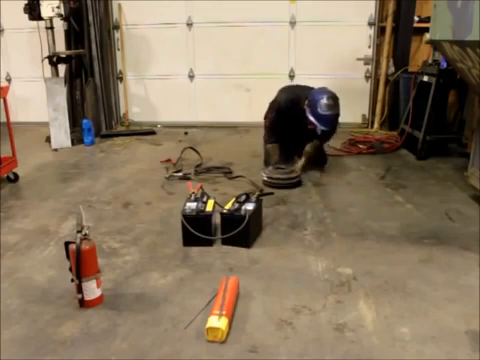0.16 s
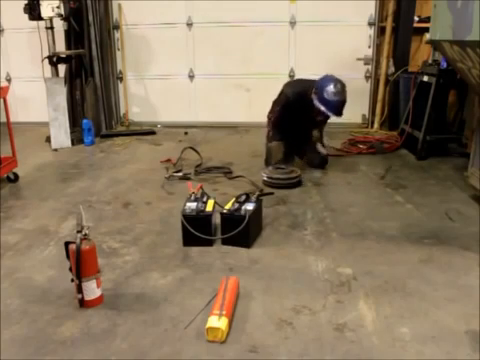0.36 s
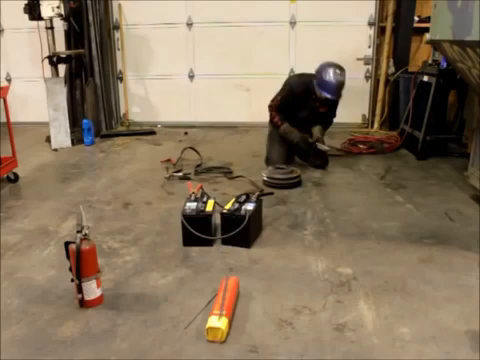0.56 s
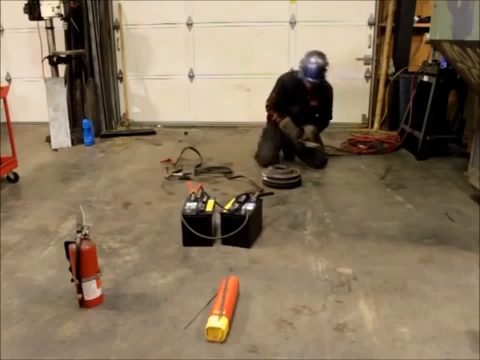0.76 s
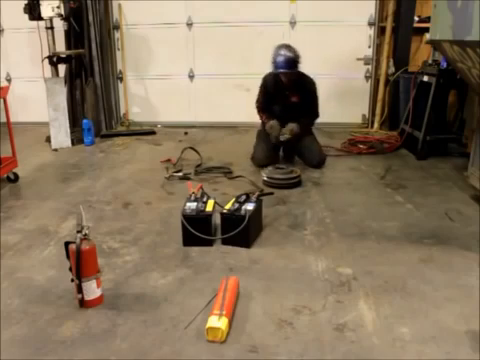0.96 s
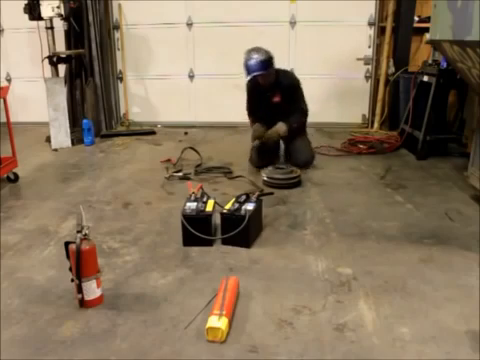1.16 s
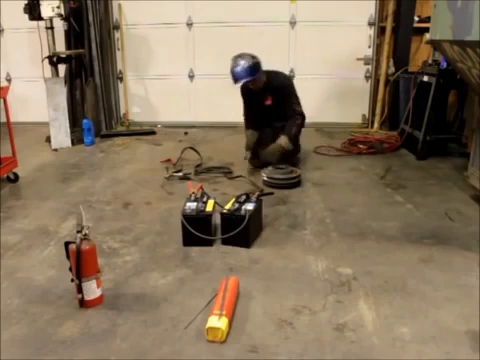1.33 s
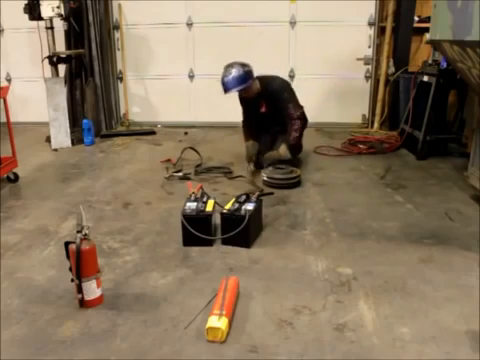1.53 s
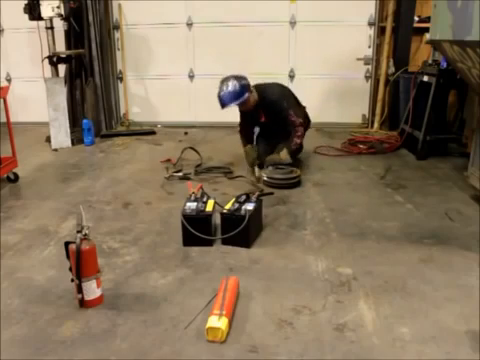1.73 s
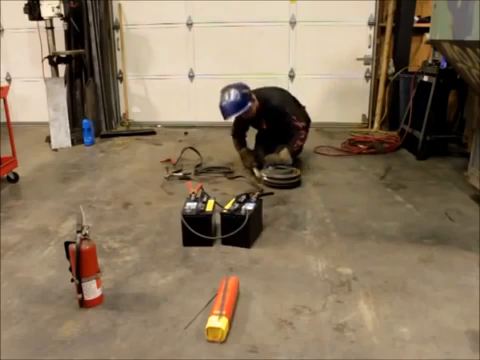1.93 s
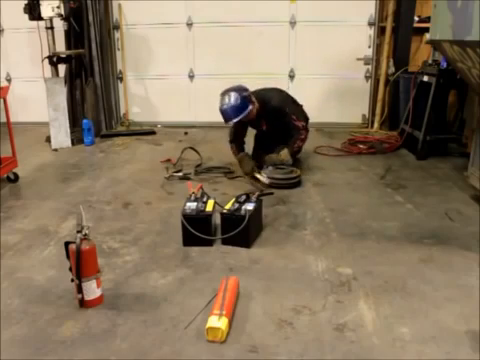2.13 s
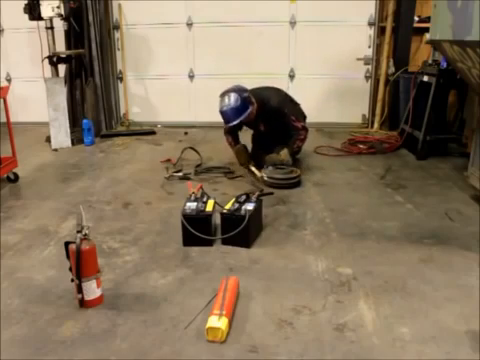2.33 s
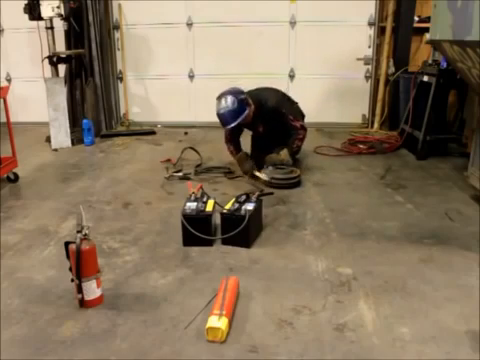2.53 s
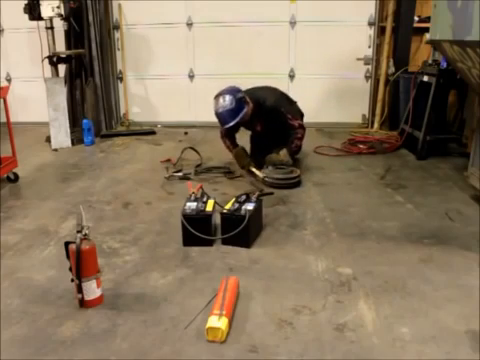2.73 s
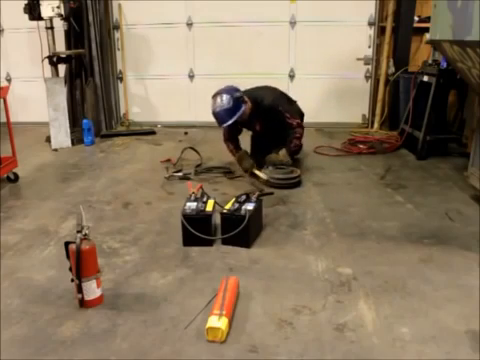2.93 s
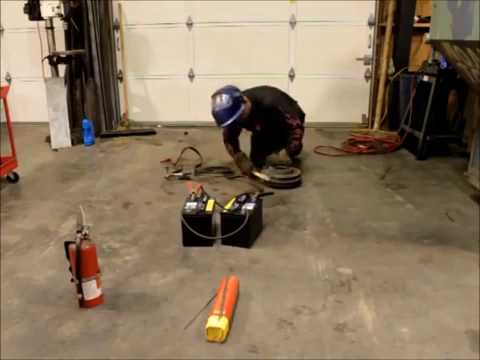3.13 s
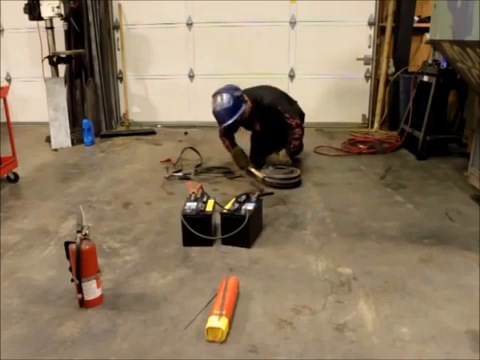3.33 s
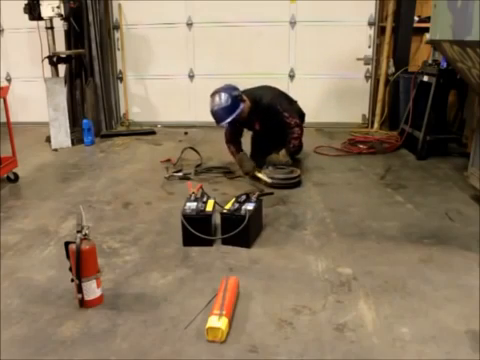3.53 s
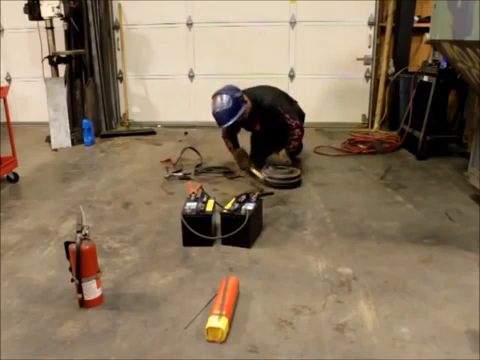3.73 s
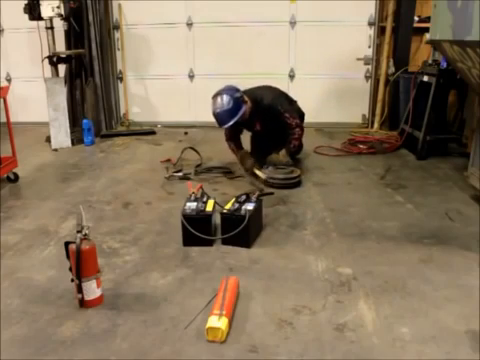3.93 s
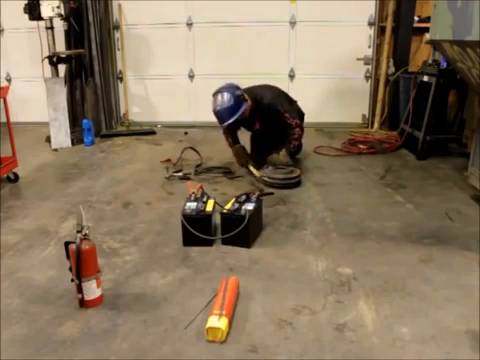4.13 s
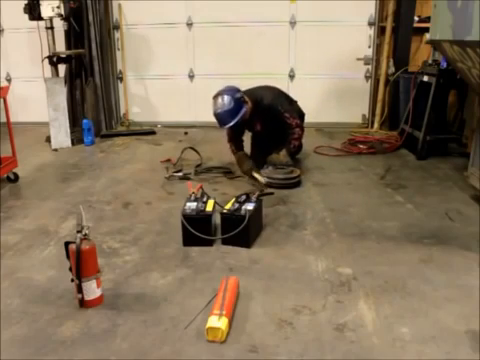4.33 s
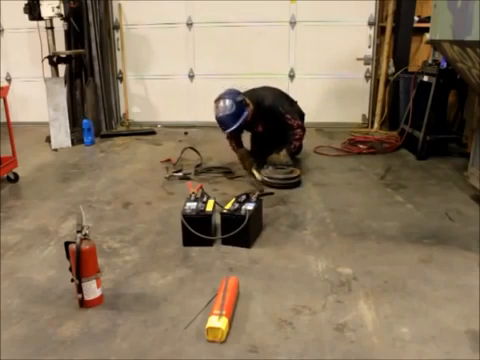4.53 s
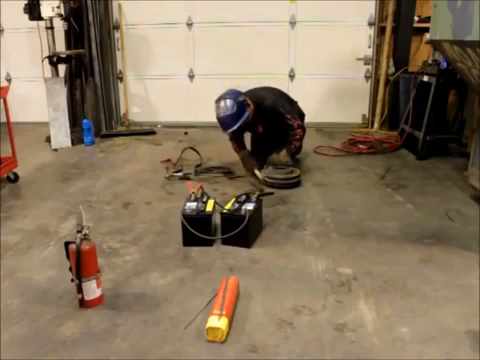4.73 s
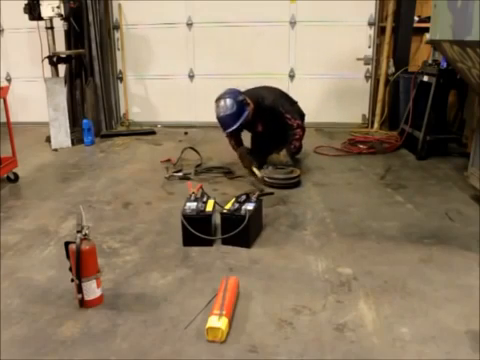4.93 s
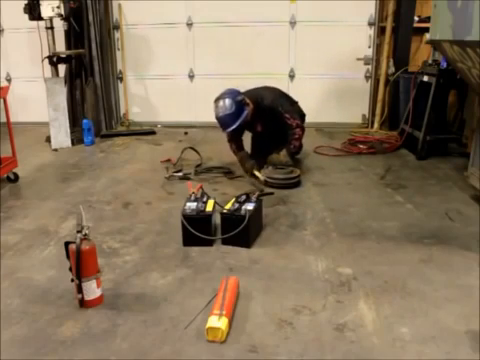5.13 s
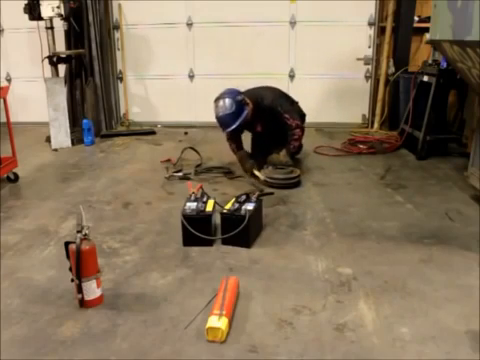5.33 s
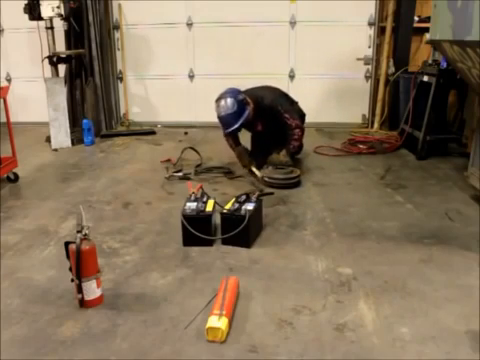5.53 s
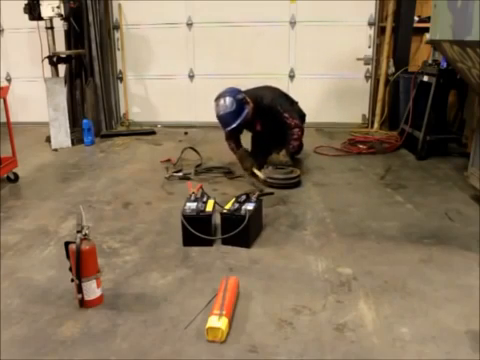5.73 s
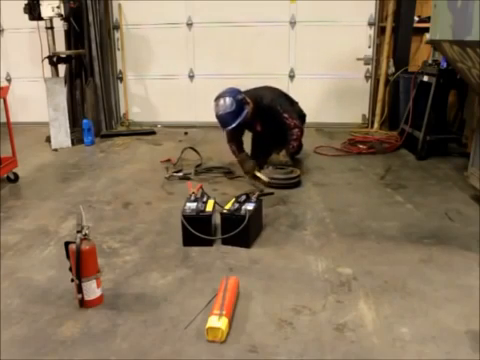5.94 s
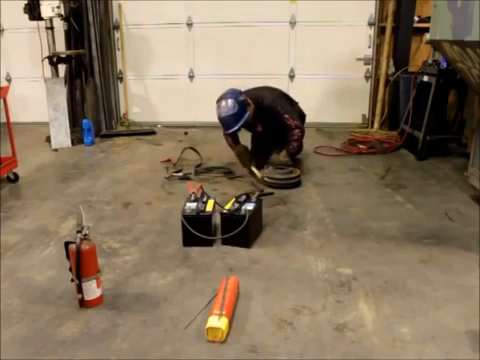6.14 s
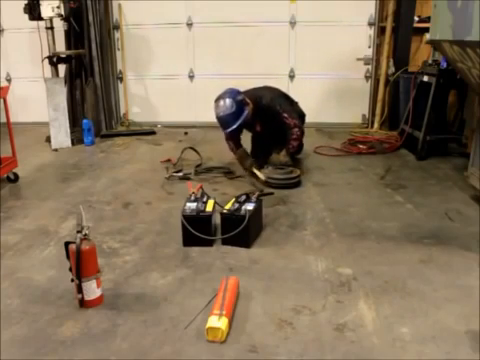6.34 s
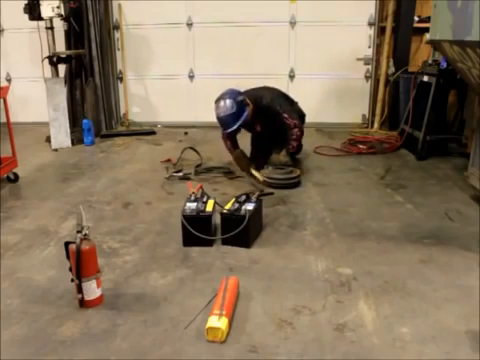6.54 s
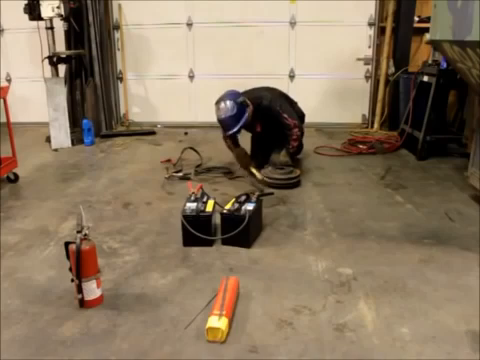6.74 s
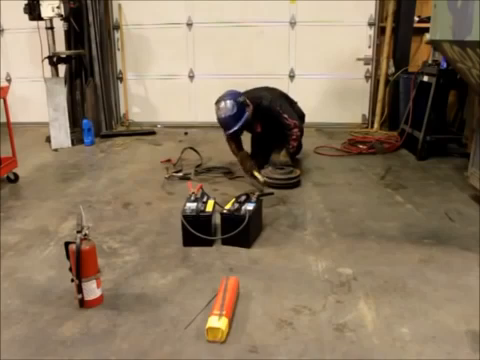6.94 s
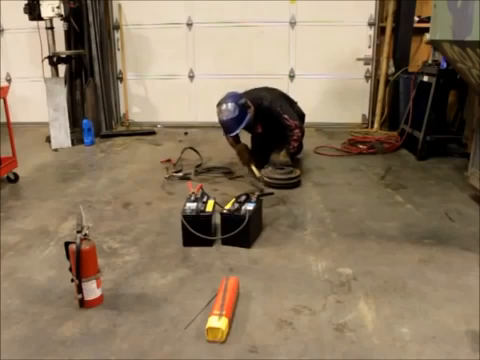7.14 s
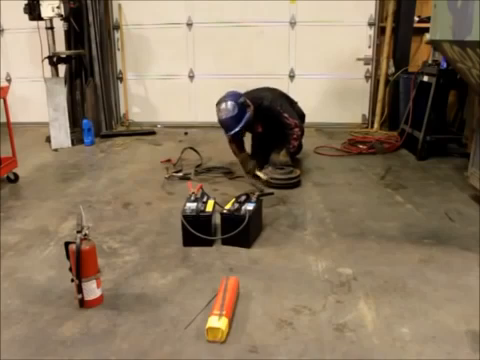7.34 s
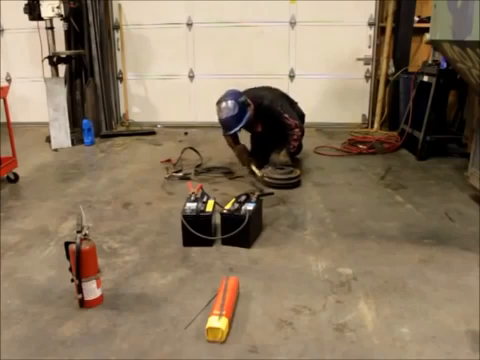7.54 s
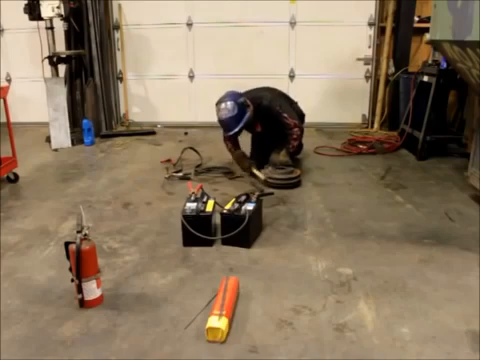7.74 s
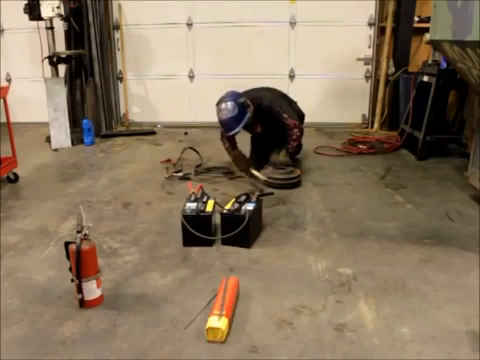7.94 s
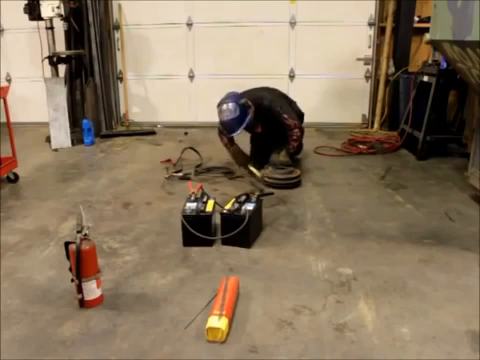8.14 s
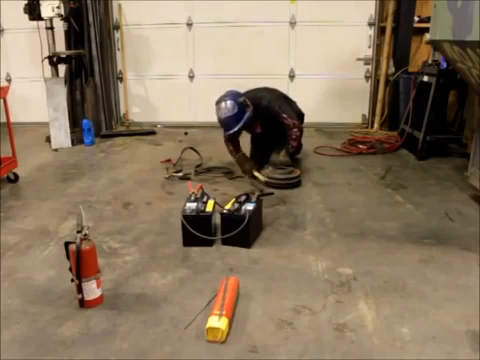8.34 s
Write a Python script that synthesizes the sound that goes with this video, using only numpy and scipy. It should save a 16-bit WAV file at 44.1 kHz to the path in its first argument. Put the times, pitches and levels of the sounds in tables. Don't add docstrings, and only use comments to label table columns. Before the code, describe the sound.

A last hard stroke of a wire brush on steel rasps at once and its echo fades, leaving lamp hum, hiss and a far motor winding down, with faint ticks. After about two seconds the scrubbing returns in quick alternating strokes, pauses briefly with a sharp metallic tick, then runs again to the end, loosening slightly and knocking the part on concrete. One microphone a few metres away in a reverberant garage.

```python
import sys
import numpy as np
from scipy import signal
from scipy.fft import rfft, irfft, next_fast_len
from scipy.io import wavfile
from scipy.ndimage import uniform_filter1d

SR = 44100
rng = np.random.default_rng(int(sys.argv[2]) if len(sys.argv) > 2 else 0)


def digitize_waveform(pressure):
    field = np.atleast_2d(pressure).T
    bounded = np.clip(field, -1, 1)
    quanta = np.round(bounded * 32767).astype(np.int16)
    wavfile.write(sys.argv[1], SR, quanta)


def gain_from_db(level_db):
    decades = np.asarray(level_db, float) / 20
    return 10 ** decades


N = 369558
LEAD = SR // 2
M = N + LEAD
T = (np.arange(M) - LEAD) / SR
MAINS_HZ = 59.993


def unit(x):
    return x / np.sqrt(np.mean(x ** 2))


def on_log(hz, table):
    points = np.array(table)
    return np.interp(np.log(hz + 1), np.log(points[:, 0]), points[:, 1])


def colour(x, table):
    size = next_fast_len(len(x))
    gain = gain_from_db(on_log(np.fft.rfftfreq(size, 1 / SR), table))
    return irfft(rfft(x, size) * gain, size)[:len(x)]


def ring(x, hz, width):
    return signal.lfilter(*signal.iirpeak(hz, hz / width, SR), x)


def walk(rate):
    hold = int(SR / rate)
    levels = np.repeat(rng.standard_normal(M // hold + 1), hold)
    return 0.88 * uniform_filter1d(levels, hold)[:M]


def air():
    # frequency in Hz, level in dB.
    air_spectrum = [(20, -24), (45, -29), (62, -10), (78, -6), (98, -11), (125, -6.5), (185, 1),
                    (300, -2.5), (500, -2), (1330, -6), (2300, -10.5), (2830, -9), (4020, -12),
                    (6030, -13.5), (15500, -24)]
    # time in seconds, level in dB.
    motor_levels = [(0, -43), (1.5, -43), (2.3, -50), (2.7, -75), (3.2, -70), (4.1, -58), (8.38, -68)]
    hush = unit(colour(rng.standard_normal(M), air_spectrum)) * gain_from_db(-46 + 0.17 * walk(1.3))
    rumble = unit(ring(ring(rng.standard_normal(M), 133, 60), 133, 60))
    return hush + rumble * gain_from_db(np.interp(T, *np.transpose(motor_levels)) - 15)


def buzz():
    k = np.arange(28, 150)
    size, cycle = 4096, np.zeros(2049, complex)
    fade_db = -1.3 * k * MAINS_HZ / 1000
    db = -68 + fade_db + 4 * rng.standard_normal(len(k))
    cycle[k] = gain_from_db(db) * np.exp(2j * np.pi * rng.random(len(k))) * size / 2
    place = T * MAINS_HZ % 1 * size
    return np.interp(place, np.arange(size), irfft(cycle), period=size) * gain_from_db(1.2 * walk(2.8))


def lamps():
    # multiple of mains, level in dB.
    core_hum = [(1, -61), (2, -63), (4, -59.5), (6, -62), (8, -56), (10, -59.5), (12, -61), (14, -62.5),
                (16, -64.5), (18, -69), (20, -58), (22, -56), (24, -61), (26, -57)]
    # multiple of mains, level in dB.
    plate_whine = [(30, -66), (32, -59), (36, -53.5), (38, -64), (44, -60), (46, -59), (48, -56.5),
                   (56, -62), (60, -60), (62, -65), (52, -68), (67.6, -79), (74, -68)]
    # multiple of mains (rounded below), level in dB.
    tube_buzz = [(78, -68), (79.5, -67), (90, -65), (92, -63), (99.3, -60), (98.4, -59), (99.8, -65),
                 (105, -74), (108, -65), (112, -61.5), (71.5, -65), (116, -68), (138, -67), (141, -73)]
    out = np.zeros(M)
    for group in (core_hum, plate_whine, tube_buzz):
        for k, db in group:
            phase = 2 * np.pi * (np.round(k) * MAINS_HZ * T + rng.random())
            out += gain_from_db(db + 2 + 1.5 * walk(4)) * np.sin(phase)
    return out


def knocks():
    # start in seconds, mode in Hz, level in dB, width in Hz, decay of the push in ms.
    bursts = [(.1, 930, -32.5, 900, 92), (1.12, 4000, -46, 2000, 69), (4.14, 232, -38.5, 40, 78),
              (4.17, 153, -41.5, 30, 33), (4.402, 4560, -33, 201, 14), (4.402, 3300, -44, 400, 6),
              (4.839, 936, -36, 150, 25), (7.246, 496, -37, 50, 63), (7.297, 1177, -33, 110, 28),
              (7.299, 225, -37, 120, 50), (7.33, 160, -40, 30, 23), (7.55, 183, -41, 25, 50)]
    out, dt = np.zeros(M + SR), np.arange(SR // 2) / SR
    for s, hz, db, width, push_ms in bursts:
        clear = min(60 / width, .7)
        rattle = unit(ring(rng.standard_normal(len(dt)), hz, width))
        push = clear * np.sin(2 * np.pi * hz * dt) + (1 - clear) * rattle
        envelope = (1 - np.exp(-dt / 0.0019)) * np.exp(-1000 * dt / push_ms)
        start = int(s * SR) + LEAD
        out[start:start + len(dt)] += gain_from_db(db) * envelope * push
    return out[:M]


def contacts():
    # time of full speed in seconds, rasp in dB, length in ms.
    pushes = [(-0.01, -21, 79), (2.909, -21.5, 73), (3.202, -20.5, 68), (3.511, -21.5, 70),
              (5.131, -23, 62), (5.408, -21.5, 68), (5.694, -21, 76), (5.976, -20.5, 67),
              (6.274, -21.5, 85), (6.628, -23, 92), (6.986, -22, 96), (8.35, -23, 72)]
    # time of full speed in seconds, rasp in dB, length in ms.
    pulls = [(0.114, -16.5, 43.3), (2.733, -21.5, 92), (3.043, -21, 83), (3.339, -18, 69.5),
             (3.666, -21, 81), (4.97, -22.5, 82), (5.256, -22.5, 75), (5.521, -18.5, 67.4),
             (5.813, -20, 70), (6.094, -18, 70), (6.414, -19, 84), (6.783, -23.5, 102), (7.134, -25, 94),
             (7.849, -23.5, 82)]
    # time of full speed in seconds, rasp in dB, length in ms.
    shoves = [(2.127, -25.5, 132), (2.584, -23.5, 98), (4.844, -25.5, 81), (7.363, -21.5, 70),
              (7.709, -23, 84), (8.029, -22, 75)]
    # time of full speed in seconds, rasp in dB, length in ms.
    drags = [(2.279, -25.5, 117), (3.819, -26, 120), (3.987, -20.5, 117), (4.536, -24, 108),
             (7.476, -20, 82), (8.14, -21, 96)]
    # time of full
    # speed in seconds, rasp in dB, length in ms, steel ring minus rasp in dB.
    rubs = [(.19, -22, 50, -6.5), (.64, -49, 39, 2), (1.06, -53, 60, 5), (1.12, -42, 32, 9),
            (1.27, -54, 150, 5), (1.87, -45.5, 70, 1), (1.99, -43, 66, -13), (3.045, -28, 33, -14),
            (3.9, -35, 32, -1), (4.008, -21.5, 34, -11), (4.11, -33.5, 140, -6), (4.42, -30, 17, -2),
            (4.439, -32, 32, 0), (.01, -36, 80, 8.5), (1.797, -36.5, 8, -7), (6.65, -37, 110, 2.5),
            (7.26, -37.5, 90, -1)]
    # time of full speed in seconds, rasp in dB, length in ms,
    # steel ring minus rasp in dB.
    ticks = [
        (.543, -48, 12, -13),
        (1.716, -49, 33, -12),
        (1.812, -39, 24, -6),
        (1.982, -43, 8, -12),
        (4.403, -26.5, 5.3, -4),
    ]
    found = []
    for rows, rise, ring_db in ((pushes, .47, -9), (pulls, 0.41, -8), (shoves, 0.58, -8.5), (drags, .23, -9)):
        for s, db, ms in rows:
            steel_db = ring_db - 0.29 * (db + 22)
            found.append((s, db, ms * rise, ms * (1 - rise), steel_db, -2.5))
    for rows, rise in ((rubs, 0.5), (ticks, 0.18)):
        for s, db, ms, steel_db in rows:
            bright_db = -2 - .4 * steel_db
            found.append((s, db, ms * rise, ms * (1 - rise), steel_db, bright_db))
    return found


def slips(rate, spread_db):
    hit, sign, size = rng.random((3, M))
    strength = gain_from_db(-spread_db * np.log(size + 1 / 60))
    return unit((hit < rate / SR) * np.sign(sign - .5) * strength)


def swells(db):
    power = np.zeros(M)
    for (s, _, rise, fall, *_), d in zip(contacts(), db):
        near = slice(max(int((s - .3) * SR) + LEAD, 0), int((s + .3) * SR) + LEAD)
        dt = 1000 * (T[near] - s)
        power[near] += gain_from_db(d) ** 2 * np.exp(-(dt / np.where(dt < 0, rise, fall)) ** 2)
    return np.sqrt(power)


def brush():
    # frequency in Hz, level in dB per Hz.
    rasp_spectrum = [(1470, -25.5), (2500, -8), (3130, -9), (5120, -7.5), (7330, 0), (10700, 3),
                     (14400, 1.5), (16000, -1.5)]
    # frequency in Hz, level in dB per Hz.
    steel_spectrum = [(150, -36), (260, -29), (437, -10), (636, -12), (927, -7.5), (1260, -9), (2000, -6),
                      (2800, -10), (3500, -8), (7000, -10.5), (9100, -35)]
    # frequency in Hz, width in Hz, level in dB.
    part_rings = [(1200, 7.9, -20), (2660, 39, -13.5), (2800, 84, -11), (2835, 200, -8), (2910, 55, -11),
                  (4560, 420, -17)]
    # frequency in Hz, width in Hz, dB over the broad response.
    thin_modes = [(1474, 9, 10), (1660, 12, 3), (1837, 9, 6), (2085, 10, 3), (2831, 8, 12), (3305, 12, 2),
                  (3440, 12, 2), (4562, 16, 3)]
    # time in seconds, level in dB.
    hold_levels = [(0, -6), (1.9, -2), (2.5, -3), (4.2, -6.5), (6.3, -4), (7, -7), (7.6, -9)]
    _, db, _, _, steel_db, bright_db = np.transpose(contacts())
    flutter = walk(70) - uniform_filter1d(walk(100), size=SR)
    drive = slips(rate=9000, spread_db=2.5) * gain_from_db(flutter)
    twang = sum(ring(slips(rate=40, spread_db=3.0), hz, 180) for hz in np.linspace(5200, 14500, num=24))
    rasp = unit(colour(drive + gain_from_db(-9) * unit(twang), rasp_spectrum))
    dull = signal.sosfiltfilt(signal.butter(1, 9000, fs=SR, output="sos"), rasp)
    bright = rasp - dull
    tips = gain_from_db(1.5) * (dull * swells(db - bright_db / 2) + bright * swells(db + bright_db / 2))
    shake = (drive + gain_from_db(-5.5) * slips(rate=6000, spread_db=-1.0)) * swells(db + steel_db)
    hold_db = np.interp(T, *np.transpose(hold_levels))
    rings = np.zeros(M)
    for hz, width, d in part_rings:
        rings += gain_from_db(d + 4) * ring(shake * gain_from_db(hold_db + 3.9 * walk(22)), hz, width)
    for hz, width, d in thin_modes:
        rings += gain_from_db(on_log(hz, steel_spectrum) + d) * ring(shake * (T > 2), hz, width)
    return tips + gain_from_db(6.5) * (colour(shake, steel_spectrum) + rings)


def tail():
    # frequency in Hz, reverberation time t60 in seconds.
    decay_times = [(300, 1.1), (1400, 1.36), (2600, 0.98), (4500, 0.92), (6000, 0.78), (8000, 0.58),
                   (15000, 0.4)]
    hz, s, cells = signal.stft(rng.standard_normal(SR), SR, nperseg=256)
    decay = gain_from_db(-60 * s / on_log(hz, decay_times)[:, None])
    echo = signal.istft(cells * decay, SR)[1]
    echo = echo * (1 - np.exp(-np.arange(len(echo)) / SR / 0.012))
    return echo / np.sqrt(np.sum(echo ** 2))


def garage(x, wet_db, count):
    place = T * 16 % count
    wet = 0
    for k in range(count):
        away = np.minimum(abs(place - k), count - abs(place - k))
        share = np.cos(np.pi / 2 * np.minimum(away, 1))
        wet = wet + signal.fftconvolve(x * share, tail())[:M]
    return (x + gain_from_db(wet_db) * wet) / np.sqrt(1 + gain_from_db(wet_db) ** 2)


def scene():
    work = garage(brush(), wet_db=-1.5, count=8) + garage(knocks(), wet_db=-8, count=1)
    back = lamps() + air() + buzz()
    busy = uniform_filter1d(abs(work), int(0.43 * SR))
    mono = work + back * gain_from_db(-1 * np.tanh(busy / .02))
    return np.tile(mono[LEAD:], (2, 1))


def swapped(mono):
    # time in seconds, band centre in Hz.
    noise_bands = [(1.37, 11700), (1.465, 13800), (1.86, 6600), (3.05, 9000), (3.05, 13500), (3.72, 11700),
                   (4.135, 6600), (4.135, 9300), (4.135, 13100), (5.62, 13000), (6.11, 13800), (6.64, 6000),
                   (6.785, 14300)]
    side, size = np.zeros(N), 2048
    hz = np.fft.rfftfreq(size, 1 / SR)
    for s, centre in noise_bands:
        frame = slice(int(s * SR) - size // 2, int(s * SR) + size // 2)
        band = abs(rfft(mono[frame])) * (abs(hz - centre) < 1900 / 2)
        noise = irfft(band * np.exp(2j * np.pi * rng.random(len(hz))))
        side[frame] += gain_from_db(-2.5) * noise * np.hanning(size)
    return side


def band_limit(x):
    return signal.sosfilt(signal.butter(12, 15010, fs=SR, output="sos"), x)


def record(dry):
    ceiling = .7
    soft = ceiling * np.tanh(dry / ceiling)
    mix = soft + np.outer([1, -1], swapped(soft[0]))
    return band_limit(mix)


dry = scene()
out = record(dry)
digitize_waveform(out)
```